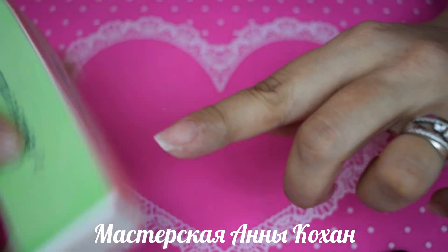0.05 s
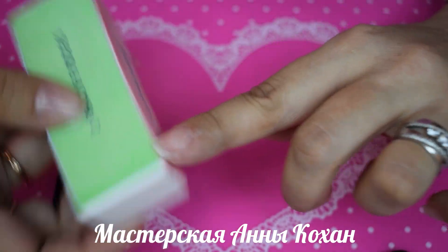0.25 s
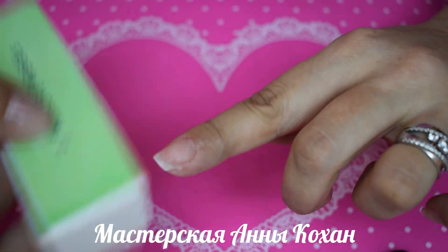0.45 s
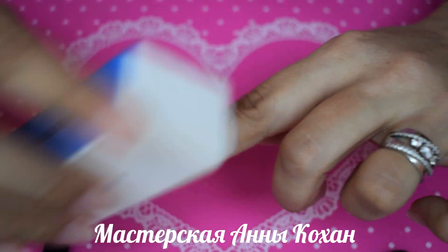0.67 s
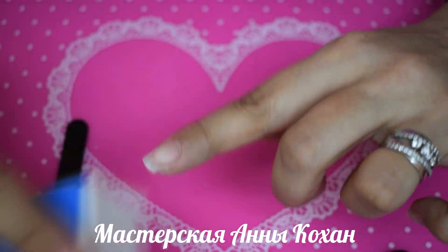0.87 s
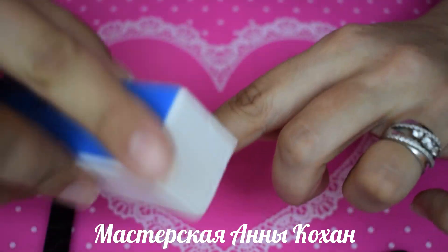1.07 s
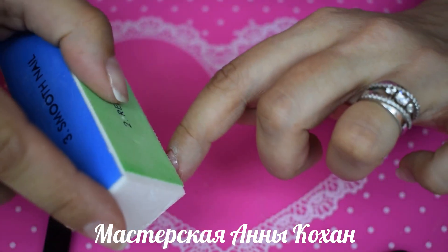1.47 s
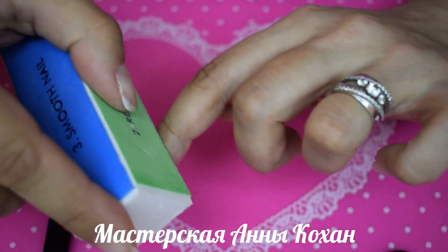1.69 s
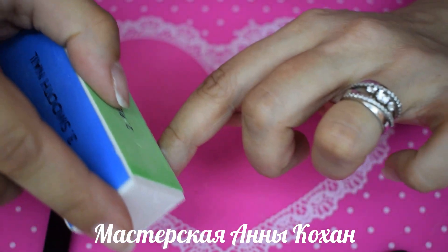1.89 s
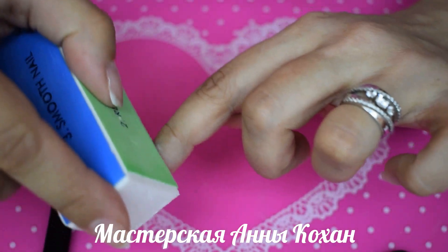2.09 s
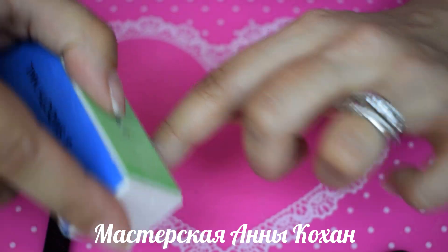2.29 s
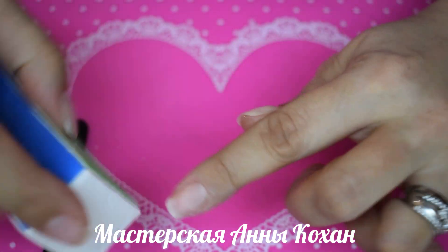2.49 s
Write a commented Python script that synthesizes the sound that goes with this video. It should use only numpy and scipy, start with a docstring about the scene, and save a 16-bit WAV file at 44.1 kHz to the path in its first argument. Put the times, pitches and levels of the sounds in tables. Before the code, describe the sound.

Dry, gritty strokes of a buffer block on a fingernail, heard up close in a small quiet room. Three separate scrapes with soft knocks lead into a fast run of lighter rubs with tiny squeaks, over faint hiss.

```python
"""A foam buffer block rasps over a fingernail, close to a stereo microphone in a quiet small room.
Three firm strokes, six lighter ones, a last graze: grit catches and sounds the resonances of block
and nail, now and then sticking in a squeak. The block taps down before some strokes and flicks off
the nail's edge after others. Faint handling, hiss, a thin hum and an early whine lie below."""
import sys
import numpy as np
from scipy import signal
from scipy.fft import rfft, irfft
from scipy.io import wavfile

SR = 44100
rng = np.random.default_rng(int(sys.argv[2]) if len(sys.argv) > 2 else 0)


def unload_audio(sound):
    """Save the sound as a 16-bit wav file, at the path given as the first command line argument."""
    columns = np.transpose(np.atleast_2d(sound))
    # keep every value between -1 and 1, then stretch to whole-number steps
    steps = np.round(np.clip(columns, -1, 1) * 32767)
    wavfile.write(sys.argv[1], SR, steps.astype(np.int16))


N = 116865
T = np.arange(N) / SR
FFT_SIZE = 2 ** 13
HZ = np.maximum(np.arange(FFT_SIZE // 2 + 1) * SR / FFT_SIZE, 1)


def from_db(db):
    """Decibels to gain."""
    return 10 ** (np.asarray(db) / 20)


def unit_rms(x):
    """Scale to rms 1."""
    return x / np.sqrt(np.mean(x ** 2) + 1e-20)


def curve(points):
    """A spectrum in dB, joined on a log-frequency axis."""
    hz, db = np.transpose(points)
    return np.interp(np.log(HZ), np.log(hz), db)


def peak(hz, width_hz):
    """Bell of height 1 around a resonance."""
    return 1 / (1 + (2 * (HZ - hz) / width_hz) ** 2)


def shape(x, db, keep_power=True):
    """Minimum-phase filter; with keep_power, white noise changes colour but not level."""
    cepstrum = irfft(np.log(from_db(db)))
    cepstrum[1:FFT_SIZE // 2] *= 2
    cepstrum[FFT_SIZE // 2 + 1:] = 0
    response = irfft(np.exp(rfft(cepstrum)))
    if keep_power:
        response = response / np.sqrt(np.sum(response ** 2))
    return signal.fftconvolve(x, response)[:N]


def noise():
    """White noise."""
    return rng.standard_normal(N)


def drift(hz):
    """Random wander below hz, with rms 1."""
    return unit_rms(signal.sosfilt(signal.butter(2, hz, fs=SR, output="sos"), noise()))


def blow(start, hold_s, fall_s):
    """Sudden start, hold, exponential fall."""
    return (T >= start) * np.exp(-np.maximum(T - start - hold_s, 0) / fall_s)


def bell(centre, half_length):
    """Smooth rise and fall around a moment."""
    return np.exp(-((T - centre) / half_length) ** 2)


def scatter(x, t60_s, delay_s):
    """Dense reflections that die away; power is kept."""
    t = T[:FFT_SIZE]
    tail = rng.standard_normal(FFT_SIZE) * from_db(-60 * t / t60_s) * (t >= delay_s)
    return signal.fftconvolve(x, tail / np.sqrt(np.sum(tail ** 2)))[:N]


def stereo(mid, side, side_points):
    """Two close capsules: the filtered side adds on the left and subtracts on the right."""
    return mid + shape(side, curve(side_points), keep_power=False) * np.array([[1], [-1]])


# Hiss at the microphone. Each row: frequency in Hz, relative density in dB.
HISS_SPECTRUM = [(12, 12), (24, 8), (38, -7), (70, -11), (110, -13), (200, -10.5), (270, -20.5),
                 (420, -12.5), (560, -10), (750, -6), (1000, -8.5), (1400, -7), (2000, -10), (3800, -14.5),
                 (6000, -15), (7000, -17.5), (10500, -20), (13000, -33), (15500, -33)]
# Stereo width of hiss and room tail. Each row: frequency in Hz, side against mid in dB.
AMBIENT_WIDTH = [(40, -13), (90, -8), (300, -8), (1200, -5), (4000, -5), (9000, -1.5)]


def hiss_and_hum(hiss_db=-57.5, hum_db=-69, hum_hz=500.5):
    """The quiet room: wide, steady hiss with a thin hum in the centre."""
    mid, side = (shape(noise(), curve(HISS_SPECTRUM)) for _ in range(2))
    hum = np.sqrt(2) * np.sin(2 * np.pi * hum_hz * T)
    return from_db(hiss_db) * stereo(mid, side, AMBIENT_WIDTH) + from_db(hum_db) * hum


def whine(db=-62.5, waver_db=1, end_s=1.1, fade_s=0.15):
    """A faint, narrow band of noise wavers and fades out around the third stroke."""
    band = shape(noise(), 20 * np.log10(peak(hz=1195, width_hz=40)))
    fade = np.clip((end_s - T) / fade_s, 0, 1)
    return from_db(db - waver_db * drift(hz=8.8)) * band * fade


# Tone of the room's reflections. Each row: frequency in Hz, gain in dB.
ROOM_TONE = [(150, -66), (600, 0), (2800, -1), (6000, -0.5), (14000, 0)]


def room_tail(close, db=-14):
    """The small room returns a short, diffuse tail with little bass."""
    sent = from_db(db) * shape(close, curve(ROOM_TONE), keep_power=False)
    mid, side = (scatter(sent, t60_s=0.16, delay_s=0.013) for _ in range(2))
    return stereo(mid, side, AMBIENT_WIDTH)


def grit(grains_per_s=11000, spread_db=2.5, judder_db=0.5):
    """Abrasive grains catch at random, most weakly and a few hard, while the contact judders."""
    sizes = from_db(spread_db * np.minimum(rng.exponential(1, N), 5))
    signs = rng.choice([-1, 1], N)
    catches = rng.random(N) < grains_per_s / SR
    judder = from_db(judder_db * drift(hz=113))
    return unit_rms(sizes * signs * catches * judder)


# Light handling ticks. Each row: start in seconds, level in dB.
TICKS = [(0.432, -54), (.929, -50.5), (1.236, -56), (1.362, -57.5)]
# Fingers shifting. Each row: centre in seconds, level in dB, half length in seconds.
RUSTLES = [(0.507, -54, 0.021), (0.591, -60, 0.043), (0.717, -50.5, 0.022), (0.947, -61, 0.12),
           (1.406, -65, 0.019), (2.417, -53, 0.036)]
# Hands meeting the table. Each row: start in seconds, level in dB.
BUMPS = [(.395, -69), (.58, -68), (1.662, -47.5)]
# Their three colours from close by. Each row: frequency in Hz, relative density in dB.
TICK_SPECTRUM = [(500, -34), (3000, -12), (7000, -2), (11500, -1), (15500, -16)]
RUSTLE_SPECTRUM = [(150, 9), (400, 3), (1200, 13), (3000, 14.5), (6000, 5.5), (15000, -27)]
BUMP_SPECTRUM = [(25, -43), (80, -7), (150, 3), (230, -5.5), (340, -19.5), (900, -36)]


def handling():
    """The block ticks and rustles in the fingers, and the hands bump softly on the table."""
    ticks = grit() * sum(from_db(db) * blow(at, hold_s=0, fall_s=0.0073) for at, db in TICKS)
    rustles = grit() * sum(from_db(db) * bell(at, half) for at, db, half in RUSTLES)
    bumps = noise() * sum(from_db(db) * blow(at, hold_s=0, fall_s=0.035) for at, db in BUMPS)
    return (shape(ticks, curve(TICK_SPECTRUM))
            + shape(rustles, curve(RUSTLE_SPECTRUM))
            + shape(bumps, curve(BUMP_SPECTRUM)))


# Squeaks on the nail. Each row: centre in seconds, level in dB, half length in seconds, pitch in Hz.
SQUEAKS = [(.838, -46, .025, 6750), (1.972, -41, .012, 2790), (2.204, -40, .005, 2800)]


def squeaks(pitch_wander=0.0223):
    """The grit sticks and slips, locking to one resonance in a short rough tone."""
    wobbly_time = np.cumsum(1 + pitch_wander * drift(hz=233)) / SR
    return sum(from_db(db) * bell(at, half) * np.sqrt(2) * np.sin(2 * np.pi * hz * wobbly_time)
               for at, db, half, hz in SQUEAKS)


# Resonances and hollows of block and nail.
# Each row: frequency in Hz, width in Hz, lift in dB in the first grip, lift in dB in the second.
RESONANCES = [(770, 120, 3, 3), (1190, 100, 10, 3), (1560, 60, 6, 0), (1725, 80, 5, 4), (1915, 80, 1, 6),
              (2160, 90, 1, 5), (2390, 100, 3, 7), (2540, 110, -1, -5), (2770, 100, 3, 5),
              (2900, 130, 2, -3), (3460, 130, 4, 3), (3790, 80, -4, -9), (3930, 160, -1, 6),
              (4200, 140, 0, 4), (5390, 70, 4, 7), (5780, 300, -1, 4), (6400, 300, -2, -5),
              (6700, 170, 7, 6), (9000, 250, 6, 0), (11900, 200, 2, 6)]


def contact_colour(at, bass_db, treble_db, regrip_s=1.4, bass_hz=1300, treble_hz=6000):
    """Response in dB of block and nail in the current grip; bass and treble follow how the block lies."""
    body = sum((first if at < regrip_s else second) * peak(hz, width)
               for hz, width, first, second in RESONANCES)
    return body + bass_db / (1 + (HZ / bass_hz) ** 6) + treble_db / (1 + (treble_hz / HZ) ** 6)


# The block taps the finger. Each row: start in seconds, then level, bass and treble in dB.
KNOCKS = [(0.7051, -37.5, -7, -11), (0.8775, -46, 2, 6), (1.057, -35, 1, -8), (1.155, -30, 18.5, -8)]
# Colour of a tap. Each row: frequency in Hz, relative density in dB.
KNOCK_SPECTRUM = [(40, -67), (130, -51), (260, -25.5), (500, -3.5), (800, -3.5), (1400, -5), (2300, 1.5),
                  (3000, -1), (3800, -4.5), (4700, -7), (8000, -22), (15000, -39)]


def knocks():
    """Short padded contacts of block and finger."""
    out = 0
    for start, db, *colour in KNOCKS:
        burst = grit() * from_db(db) * blow(start, hold_s=0.0035, fall_s=0.002)
        out += shape(burst, curve(KNOCK_SPECTRUM) + contact_colour(start, *colour))
    return out


# Grit on nail, heard up close. Each row: frequency in Hz, relative density in dB.
RASP_SPECTRUM = [(40, -72), (130, -36.5), (300, -39.5), (560, -15), (950, -14.5), (1400, -9), (2200, -0.5),
                 (3600, -0.5), (5300, -7), (7500, -15.5), (12000, -21), (15500, -37)]
# Reflections off hands and table, near the microphone. Each row: frequency in Hz, gain in dB.
NEAR_REFLECTIONS = [(1500, -19.5), (3000, -13.5), (5000, -3.5), (14000, -2)]


def rasp(force, at, bass_db, treble_db, nail_hz, nail_db):
    """Grit under force sounds block and nail; each hand position has its own near reflections."""
    nail = nail_db * peak(nail_hz, width_hz=610)
    direct = shape(grit() * force, curve(RASP_SPECTRUM) + contact_colour(at, bass_db, treble_db) + nail)
    reflections = scatter(direct, t60_s=0.014, delay_s=0.0006)
    return direct + shape(reflections, curve(NEAR_REFLECTIONS), keep_power=False)


# The block leaves the nail. Each row: peak time in seconds, level in dB, rise and fall in seconds,
# bass and treble in dB, nail resonance in Hz, its lift in dB.
FLICKS = [(0.2693, -23, 0.0086, 0.0061, 5.5, -5.5, 2430, 5),
          (0.8786, -26, 0.0014, 0.0066, 11, 0.5, 2970, 7),
          (1.155, -18, .0016, 0.0025, 10, 10.5, 2390, 18.5),
          (2.386, -29, 0.003, 0.0052, 10.5, 5, 2180, 9.5)]


def flicks():
    """The nail's edge digs into the grit and snaps free."""
    out = 0
    for at, db, rise, fall, *colour in FLICKS:
        spike = np.exp(-np.maximum((at - T) / rise, (T - at) / fall))
        out += rasp(from_db(db) * spike, at, *colour)
    return out


# Buffing strokes, close to the microphone. Each row: start, length, attack and release in seconds,
# level reached in dB, swell up to it in dB, bass and treble in dB, nail resonance in Hz, its lift in dB.
STROKES = [(0.214, 0.075, 0.023, 0.032, -33.5, 1.5, 7, -0.5, 1550, 3),
           (0.742, 0.14, 0.048, 0.027, -32.5, 5, 1.5, -2.5, 3560, 2.5),
           (1.0798, 0.089, 0.03, .012, -32.5, 0.5, 5.5, -2, 3320, 1.5),
           (1.588, 0.13, 0.041, 0.065, -41, -4, 6, -5, 4180, -0.5),
           (1.762, 0.089, 0.029, 0.046, -36, 5.5, 9.5, -3.5, 2100, 4.5),
           (1.904, 0.079, 0.0085, 0.041, -34, 6.5, 3.5, -3.5, 3380, 1.5),
           (2.033, 0.07, 0.013, 0.034, -39.5, -2.5, 5.5, -3.5, 2350, 4.5),
           (2.143, .089, 0.014, 0.031, -37, 0.5, 0.5, -2, 5870, 3),
           (2.277, 0.1173, 0.009, 0.0027, -36, 2, 6, 0.5, 3050, 0.5),
           (2.516, 0.058, 0.029, 0.041, -45.5, 5, 13, 11, 2940, 6)]


def strokes():
    """The block speeds up, slides over the nail under changing pressure and slows down."""
    out = 0
    for start, length, attack, release, db, swell_db, *colour in STROKES:
        t = T - start
        speed_up = np.sin(np.pi / 2 * np.clip(t / attack, 0, 1))
        slow_down = np.sin(np.pi / 2 * np.clip((length - t) / release, 0, 1))
        pressure = from_db(db + swell_db * (np.clip(t / length, 0, 1) - 1))
        out += rasp((speed_up * slow_down) ** 0.96 * pressure, start, *colour)
    return out


# Up close, only the rasp's treble is wide. Each row: frequency in Hz, side against mid in dB.
CLOSE_WIDTH = [(300, -56), (1400, -88), (3100, -16.5), (7000, -7.5), (14000, -4)]


def scene():
    """The hands work centred at the microphone, a separate spray of grains to the sides, room behind."""
    close = strokes() + flicks() + knocks() + squeaks() + handling()
    room = room_tail(close)
    spray = strokes() + flicks()
    return stereo(close, spray, CLOSE_WIDTH) + room + hiss_and_hum() + whine()


def record(dry):
    """A steep low-pass cuts the highest treble."""
    cutoff_hz = 15680
    return signal.sosfilt(signal.ellip(12, 0.1, 80, cutoff_hz, fs=SR, output="sos"), dry)


dry = scene()
out = record(dry)
unload_audio(out)
```